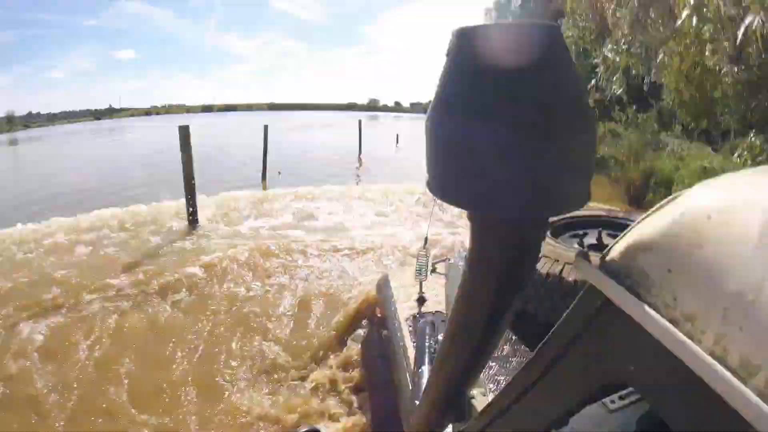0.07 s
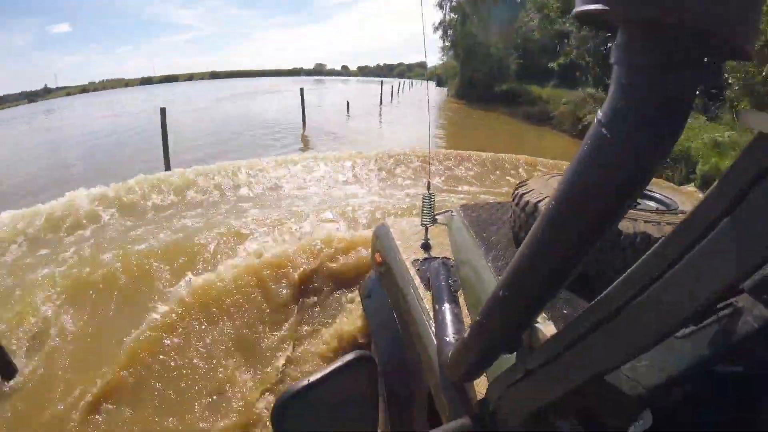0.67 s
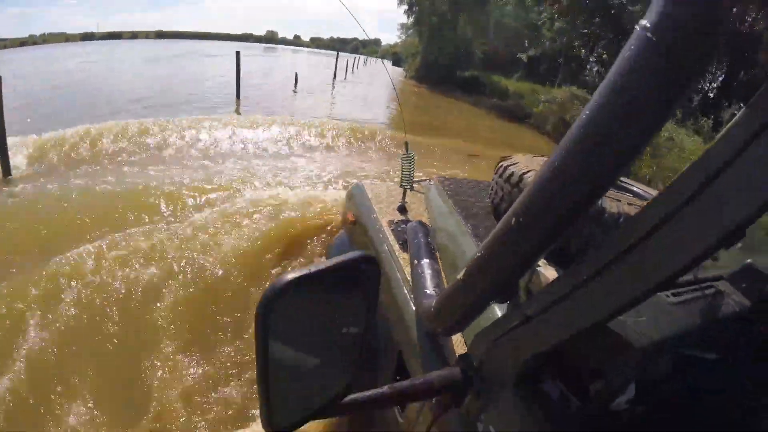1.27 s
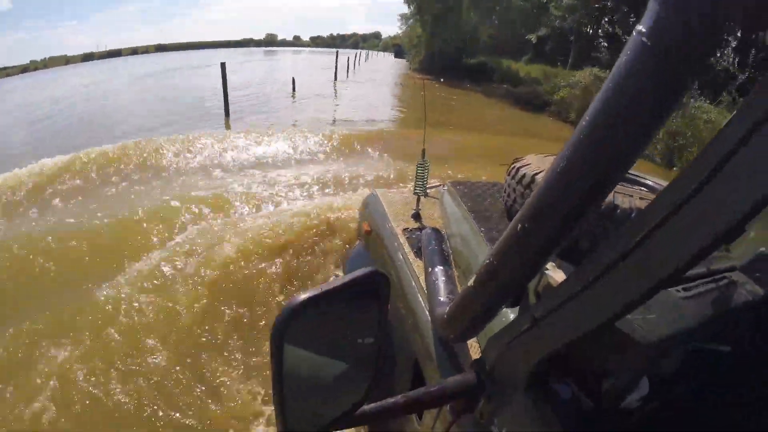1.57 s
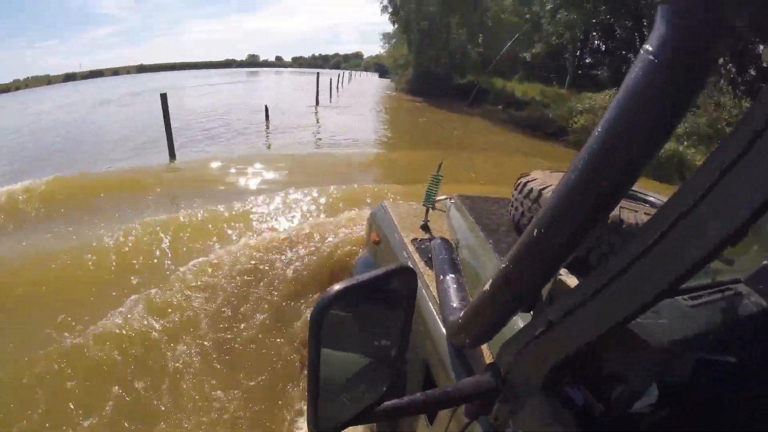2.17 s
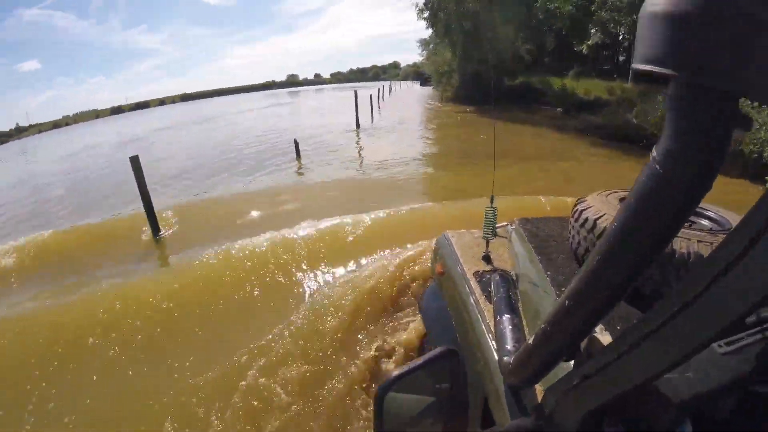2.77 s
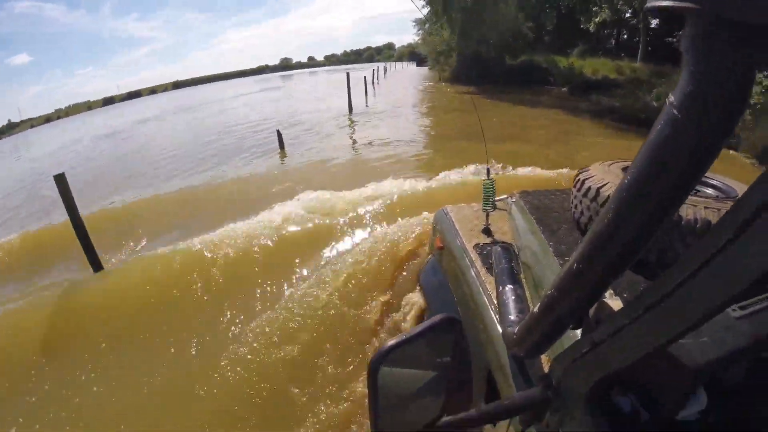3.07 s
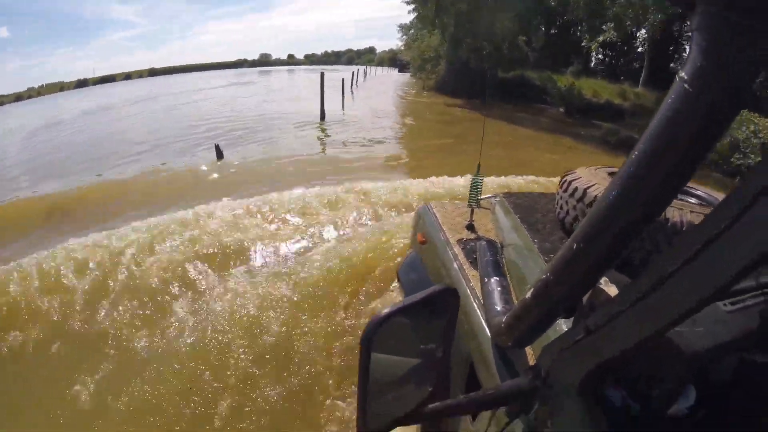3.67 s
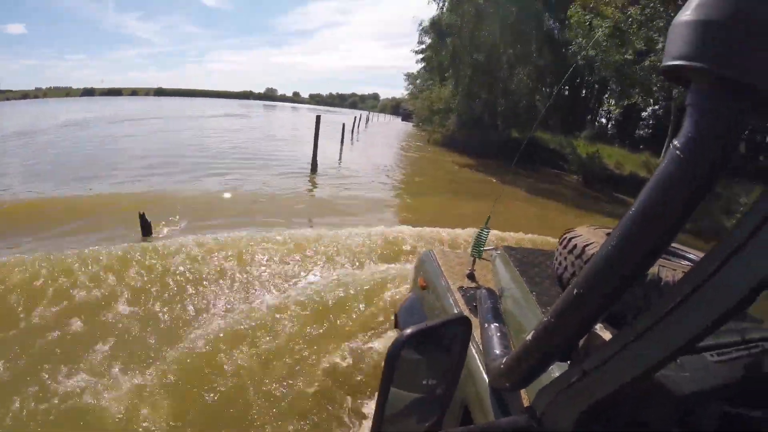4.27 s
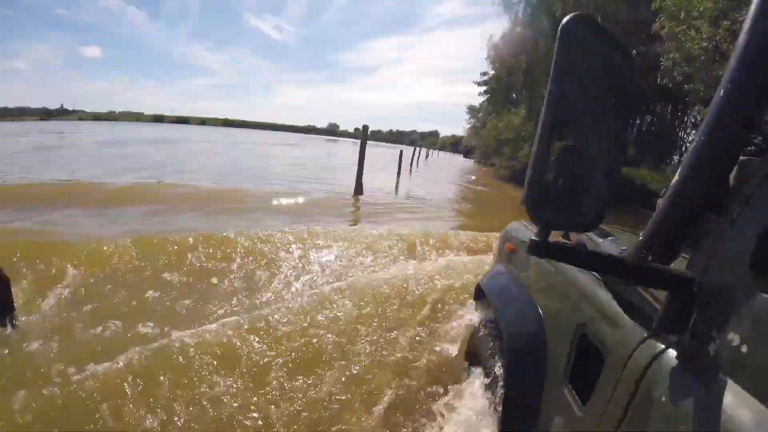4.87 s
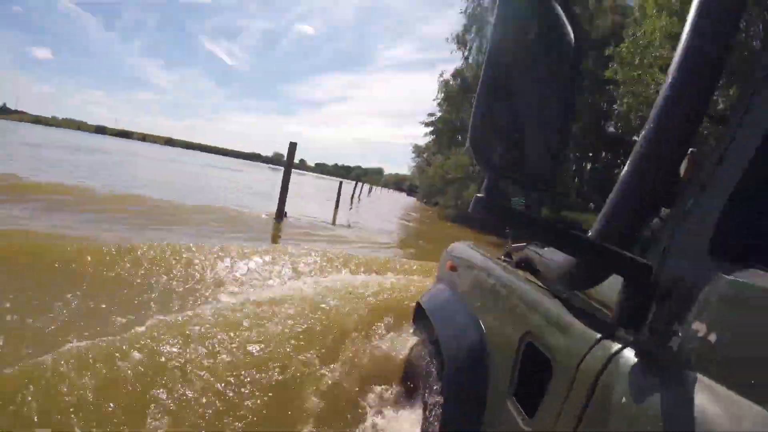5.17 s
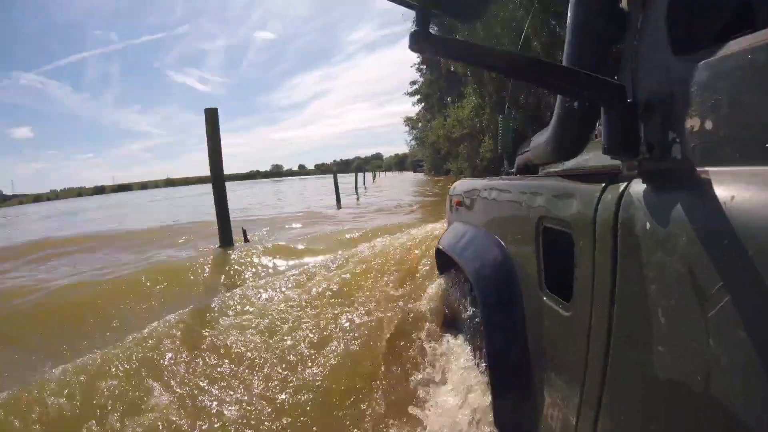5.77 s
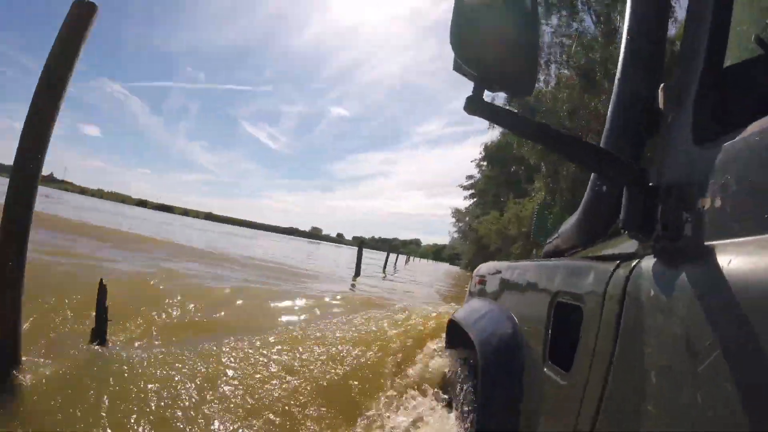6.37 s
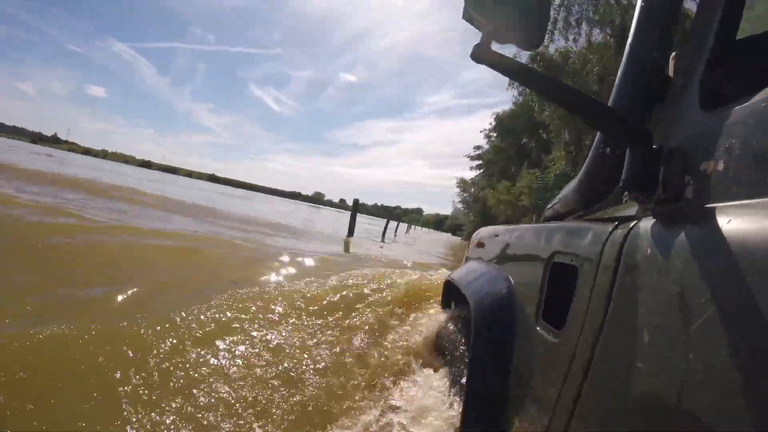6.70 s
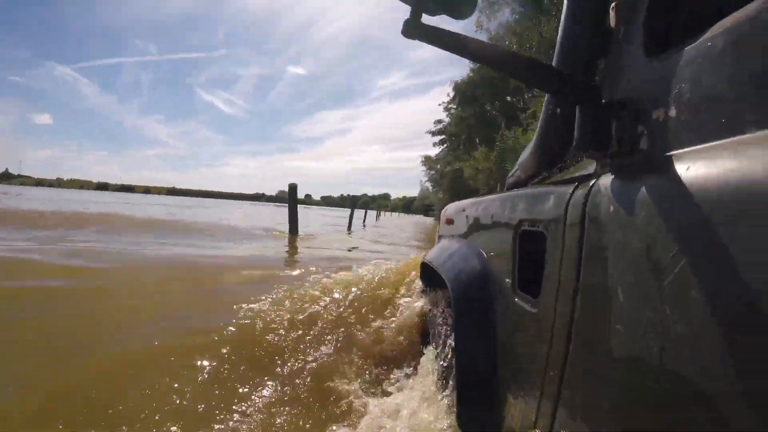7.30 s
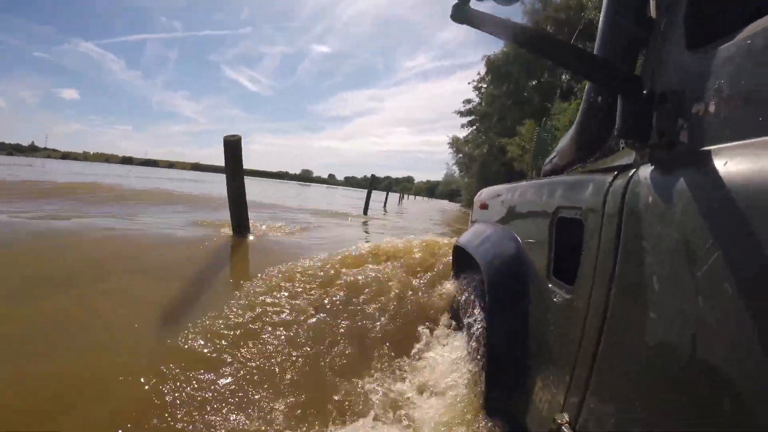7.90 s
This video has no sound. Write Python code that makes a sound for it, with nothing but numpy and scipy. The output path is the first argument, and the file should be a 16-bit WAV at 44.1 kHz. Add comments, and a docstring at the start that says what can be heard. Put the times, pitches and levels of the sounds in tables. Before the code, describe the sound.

A four-cylinder off-road truck drones steadily through deep water, its bow wave rushing and splashing, with wind buffeting the close microphone.

```python
"""A pulsing boom and rasp come first: the snorkel intake of a four-cylinder off-road truck wading a lake,
heard from a cased camera beside it. Each firing draws a gulp of air and excites the pipe's resonances.
The bow wave rushes with foam, ringing bubbles and spray; the tyre churns, and water slaps the wing.
Drops tick on the case, which also takes two dull knocks. A faint squeak falls at the very start,
and turbulent air buffets the microphone throughout."""
import sys
import numpy as np
from scipy import signal
from scipy.fft import rfft, irfft
from scipy.io import wavfile

SR = 44100
rng = np.random.default_rng(int(sys.argv[2]) if len(sys.argv) > 2 else 0)


def file_out(sig):
    """Save sig as 16-bit WAV at sys.argv[1]."""
    # one column per channel
    cols = np.atleast_2d(sig).T
    # limit, then scale
    lim = np.clip(cols, -1, 1)
    pcm = np.round(lim * 32767).astype(np.int16)
    wavfile.write(sys.argv[1], SR, pcm)


N = 350154
TIME = np.arange(N) / SR


# one rev, then the engine hunts gently against the water: (time [s], firing rate [Hz])
FIRING_RATE = [(0, 68.5), (.15, 62.8), (.5, 66.9), (.75, 75.0), (1.11, 85.4), (1.65, 74.2), (2.65, 68.3),
               (3.1, 72.8), (3.5, 69.0), (3.68, 73.2), (4.0, 69.5), (4.62, 73.5), (4.88, 70.0), (5.1, 74.1),
               (5.28, 74.8), (5.53, 69.3), (5.85, 75.7), (6.25, 73.1), (6.5, 75.0), (6.65, 70.9),
               (6.9, 73.1), (7.25, 70.2), (7.68, 70.9), (7.94, 67.3)]
# the throttle eases, then reopens: (time [s], boom gain [dB])
THROTTLE_GAIN = [(0, -0.5), (.09, -9), (.3, -6), (.5, -.7), (.72, 0.9), (1.2, 0.13), (7.94, -0.5)]
# the camera's path: (time [s], position [0 at the snorkel's mouth, 1 down by the wing])
POSITION = [(0, 0.23), (.7, 0.17), (1.3, 0.42), (1.9, 0.25), (2.4, 0.49), (2.95, 0), (3.5, 0.2), (4.45, 0),
            (5.05, 0.56), (5.35, 0.45), (6.0, 0.99), (6.95, 0.77), (7.2, 0.27), (7.5, 0.66), (7.94, 0.33)]
# the engine's upper growl: (time [s], rasp level [dB], drone level [dB])
GROWL_LEVELS = [(0, -30.5, -23.5), (.22, -32.5, -27.5), (.65, -29.5, -23.5), (1.1, -30.5, -26.5),
                (1.7, -30, -25), (2.2, -36, -27.5), (2.45, -31.5, -27), (3.1, -33, -25), (3.8, -36.5, -27),
                (4.4, -31.5, -26), (5.0, -36.5, -33.5), (5.9, -36, -26.5), (6.5, -41, -29.5),
                (7.94, -42.5, -29.5)]

def engine(start_phase=0.5303):
    """Common excitation: one crankshaft sets the timing of boom, drone and rasp."""
    firing_hz, = in_time(FIRING_RATE)
    throttle_db, = in_time(THROTTLE_GAIN)
    position, = in_time(POSITION)
    rasp_db, drone_db = in_time(GROWL_LEVELS)
    firings = start_phase + np.cumsum(firing_hz) / SR
    return (from_db(throttle_db) * boom(firings, firing_hz, position)
            + from_db(drone_db) * drone(firings, firing_hz)
            + from_db(rasp_db) * rasp(firings))


# harmonics 1 to 3: (level at the snorkel [dB], change down by the wing [dB])
BOOM_HARMONICS = [(-12.5, 2.5), (-15.5, -3), (-23.2, -10.5)]

def boom(firings, firing_hz, position, skew_cycles=0.42, flutter_db=0.54):
    """Fourier synthesis: three low harmonics form the lopsided pressure swing of each gulp of air."""
    out = 0
    for k, (db, wing_db) in enumerate(BOOM_HARMONICS, 1):
        level_db = db + wing_db * position + intake_db(k * firing_hz) + flutter_db * k * drift(23.4)
        out += from_db(level_db) * np.cos(2 * np.pi * (k * firings + skew_cycles))
    return np.sqrt(2) * out


# the intake pipe's response: (frequency [Hz], gain [dB])
INTAKE_RESPONSE = [(62, 0.1), (72, -0.53), (84, 1.3), (128, 2.5), (138, -1.5), (145, 1.4), (153, -0.3),
                   (166, -2.5), (203, 2.5), (216, 0.5), (245, -4.5), (280, 4), (305, 0), (332, 2.5),
                   (368, -3), (400, -0.5)]

def intake_db(hz):
    """Frequency response: the pipe's gain on a partial changes as its pitch moves."""
    return np.interp(hz, *np.transpose(INTAKE_RESPONSE))


# line levels, a row per firing harmonic, offset by fractions of the firing rate:
# (3/4 below [dB], 1/2 below [dB], 1/4 below [dB], on the harmonic [dB])
DRONE_LINES = [(-20, -18, -17, -34), (-1, -8, -0.5, -32), (3.5, -3, -5, -18), (1, -5, -3.5, 0),
               (1.5, -27, -6, -1.5), (-2, -12, -10.5, -25), (-7, -7.5, -9, -17), (-16, -12, -18.5, -23),
               (-18.5, -17.5, -13.5, -19.5)]
# body panels: (frequency [Hz], bandwidth [Hz], gain [dB])
PANEL_MODES = [(328.5, 26, 1), (582, 31.5, 14.5)]

def drone(firings, firing_hz, waver_db=2.0, slip_cycles=.025):
    """Subharmonics: unequal cylinders repeat every fourth firing, adding lines between the harmonics."""
    cycles, cycle_hz = firings / len(FIRING_ORDER), firing_hz / len(FIRING_ORDER)
    lines = 0
    for k, db in enumerate(np.ravel(DRONE_LINES), 1):
        phase = k * cycles + rng.random() + slip_cycles * drift(2.4)
        level_db = db + intake_db(k * cycle_hz) + waver_db * drift(1.86)
        lines += from_db(level_db) * np.cos(2 * np.pi * phase)
    # a panel hums in sympathy with whichever line passes its pitch
    panels = sum(from_db(db) * resonate(lines, hz, width) for hz, width, db in PANEL_MODES)
    return rms_one(lines + panels)


# the cylinders in turn: (strength [dB], delay [firing intervals])
FIRING_ORDER = [(2, 0), (-2, .04), (-1.5, -.03), (1.5, .02)]
# the snorkel's air column: (frequency [Hz], bandwidth [Hz], gain [dB])
SNORKEL_MODES = [(505, 47, -1.5), (571, 39, 1.5), (627.5, 50, -1), (708, 55, -4)]

def rasp(firings, uneven_db=3.5, puff_db=-3, pulsing_db=8):
    """Pipe resonance: each valve opening excites the snorkel with a kick and a puff of turbulent air."""
    kick_lead, puff_lead, jitter = 0.5524, .17, .007   # firing intervals
    number = np.arange(1, int(firings[-1]))
    strength_db, delay = np.array(FIRING_ORDER)[number % len(FIRING_ORDER)].T
    time_scatter, level_scatter = rng.standard_normal((len(number), 2)).T
    times = np.interp(number - kick_lead + delay + jitter * time_scatter, firings, TIME)
    kicks = body(clicks(zip(times, strength_db + uneven_db * level_scatter)), SNORKEL_MODES)
    airflow = from_db(pulsing_db * np.cos(2 * np.pi * (firings + puff_lead)))
    puffs = airflow * body(rng.standard_normal(N), SNORKEL_MODES)
    return rms_one(rms_one(kicks) + from_db(puff_db) * rms_one(puffs))


# strength of the bow wave: (time [s], level [dB])
WAVE_LEVEL = [(0, -39.5), (.22, -39), (.52, -34), (.95, -38), (1.5, -35.5), (1.8, -38.5), (2.13, -36),
              (2.35, -38), (2.9, -34.5), (3.4, -36.5), (4.7, -35.5), (5.5, -34), (5.9, -35), (6.25, -34),
              (6.65, -35), (6.95, -33.5), (7.35, -35.5), (7.94, -31.5)]
# rushing foam: (frequency [Hz], spectral level [dB])
FOAM_SPECTRUM = [(400, -22), (750, 0.5), (1000, -0.5), (1280, -1), (1450, -2.5), (1750, -4), (2300, -7),
                 (3100, -12), (3800, -17.5), (4400, -22.5), (6000, -64)]
# falling spray: (frequency [Hz], spectral level [dB])
SPRAY_SPECTRUM = [(3500, -55), (4400, -21), (5000, -11), (5550, -3.5), (6050, -0.5), (6700, -7),
                  (7600, -10.5), (9000, -15.5), (10800, -17), (11900, -33.5), (13200, -29), (14300, -36),
                  (15000, -49)]

def bow_wave(foam_db=0.5, fizz_db=-14.0, mist_db=-4.48, patter_db=-4.98, surge_db=0.66, swell_db=0.27):
    """Air entrainment: the breaking crest rushes with foam and bubbles; its spray patters back."""
    wave_db, = in_time(WAVE_LEVEL)
    swing_db = surge_db * drift(56) + swell_db * drift(4.5) + 0.14 * spills_db()
    foam = from_db(foam_db) * coloured(grains(per_s=9000, spread_db=1.5), FOAM_SPECTRUM)
    fizz = from_db(fizz_db) * bubbles(low_hz=751, high_hz=2890, per_s=700, spread_db=5.5, q=20)
    mist = from_db(mist_db) * coloured(rng.standard_normal(N), SPRAY_SPECTRUM)
    droplets = grains(per_s=6000 * from_db(2.5 * drift(40)), spread_db=2.0)
    patter = from_db(patter_db) * coloured(droplets, SPRAY_SPECTRUM)
    return from_db(wave_db + swing_db) * (foam + fizz + mist + patter)


# churned water: (frequency [Hz], spectral level [dB])
CHURN_SPECTRUM = [(60, -18), (110, 2), (180, 1), (260, 4.5), (330, 0.5), (400, -2), (475, 1.5), (560, -11),
                  (700, -9), (850, -17), (1300, -18.5)]

def wheel_churn(base_db=-33, wave_share=0.59, wing_db=3, lump_db=0.5, gurgle_db=-7.5):
    """Turbulence: the tyre stirs a low wash full of large bubbles, swelling with the bow wave."""
    wave_db, = in_time(WAVE_LEVEL)
    position, = in_time(POSITION)
    level_db = base_db + wave_share * (wave_db - wave_db.mean()) + wing_db * position + spills_db()
    wash = coloured(rng.standard_normal(N), CHURN_SPECTRUM) * from_db(lump_db * drift(33))
    gurgle = bubbles(low_hz=300, high_hz=850, per_s=260, spread_db=2.2, q=14)
    return from_db(level_db) * (wash + from_db(gurgle_db) * gurgle)


# the wheel arch overflows: (time [s], rise of the churn [dB])
ARCH_SPILLS = [(.75, 2.5), (1.35, 2), (4.3, 2), (5.25, 5.5), (5.97, 0), (6.8, 2.5), (7.2, 5.5), (7.65, 1.5)]

def spills_db():
    """Amplitude modulation: each spill from the wheel arch is a short, smooth rise in level."""
    return sum(db * bell(s, half_width_s=0.19) for s, db in ARCH_SPILLS)


def bubbles(low_hz, high_hz, per_s, spread_db, q, sizes=24):
    """Bubble resonance: born in clumps, each bubble rings at the pitch of its size; rms 1."""
    births = grains(per_s * from_db(3 * drift(8)), spread_db)
    size = rng.integers(0, sizes, N)
    pitches = np.geomspace(low_hz, high_hz, sizes)
    return rms_one(sum(resonate(births * (size == k), hz, hz / q) / hz for k, hz in enumerate(pitches)))


# water striking the wing: (time [s], cavity frequency [Hz], level [dB])
WING_SLAPS = [(.232, 700, -30), (.545, 630, -26), (.588, 590, -27), (1.35, 1250, -35), (2.45, 650, -25),
              (2.62, 600, -29), (2.72, 600, -29), (5.84, 750, -31), (7.17, 1150, -32), (7.205, 300, -25)]

def slaps(q=5.4):
    """Cavity resonance: a sheet of water traps a pocket of air, which rings briefly."""
    out = np.zeros(N)
    for s, hz, db in WING_SLAPS:
        swell = bell(s, half_width_s=.016)
        band = resonate(rng.standard_normal(N), hz, hz / q)
        pocket = swell * resonate(band, hz, hz / q)
        out += from_db(db) * pocket * np.std(swell) / np.std(pocket)
    return out


# drops on the case: (time [s], relative level [dB])
DROP_HITS = [(0.2646, -29), (1.4037, -22.5), (3.3393, -26), (4.1031, -29), (5.3582, -24.5), (6.3343, -27),
             (7.0836, -29), (7.638, -26)]
# the case's shell: (frequency [Hz], bandwidth [Hz], gain [dB])
CASE_MODES = [(1800, 900, -16), (5570, 220, 8), (6300, 380, 12.5), (7600, 1200, -15), (10400, 1200, -19)]
# dull knocks on the case: (time [s], relative level [dB])
KNOCK_HITS = [(.152, -8), (5.581, -1.5)]

def case_impacts(drop_gain_db=19.0, knock_gain_db=44.0):
    """Impulse response: sharp drops ring the shell's high modes; soft knocks give one short low swing."""
    ticks = body(clicks(DROP_HITS), CASE_MODES)
    soft_contact = signal.butter(2, 260, fs=SR, output="sos")
    force = signal.sosfilt(soft_contact, clicks(KNOCK_HITS) + 1e-18)
    thuds = resonate(force, hz=165, width_hz=75)
    return from_db(drop_gain_db) * ticks + from_db(knock_gain_db) * thuds


# the squeak's fall: (time [s], fundamental [Hz], level [dB])
SQUEAK_GLIDE = [(0, 605, -42), (.025, 580, -35), (.05, 522, -32), (.078, 478, -35), (.11, 470, -90)]
# its partials: (harmonic [number], relative level [dB])
SQUEAK_HARMONICS = [(1, 0), (2, -13), (3, -5), (4, -10)]

def squeak():
    """Harmonic series: the partials of a faint squeak slide down together and stop."""
    hz, level_db = in_time(SQUEAK_GLIDE)
    phase = np.cumsum(hz) / SR
    tone = sum(from_db(level_db + db) * np.sin(2 * np.pi * k * phase) for k, db in SQUEAK_HARMONICS)
    return tone * (TIME < SQUEAK_GLIDE[-1][0])


# short gusts: (time [s], level [dB])
WIND_GUSTS = [(.33, -18.5), (1.08, -29), (3.5, -25), (4.96, -24), (7.85, -23)]
# buffeting air: (frequency [Hz], spectral level [dB])
WIND_SPECTRUM = [(10, -38), (20, -5.5), (40, 1.5), (60, -5), (100, -6.5), (200, -20.5), (400, -50)]

def wind(breeze_db=-29, wing_db=4.5, lump_db=2.5):
    """Turbulent pressure: a breeze and a few gusts make lumpy low swings at the microphone."""
    position, = in_time(POSITION)
    breeze = from_db(breeze_db + wing_db * position)
    gusts = sum(from_db(db) * bell(s, half_width_s=0.078) for s, db in WIND_GUSTS)
    lumps = from_db(lump_db * drift(10.6))
    return (breeze + gusts) * lumps * coloured(rng.standard_normal(N), WIND_SPECTRUM)


def from_db(db):
    """Decibels to amplitude ratio."""
    return 10 ** (np.asarray(db) / 20)


def rms_one(x):
    """Normalisation to unit rms."""
    return x / np.sqrt(np.mean(x ** 2) + 1e-20)


def in_time(rows):
    """Linear interpolation of each column at every sample."""
    times, *columns = np.transpose(rows)
    return [np.interp(TIME, times, column) for column in columns]


def bell(centre_s, half_width_s):
    """Gaussian envelope with peak 1."""
    return np.exp(-((TIME - centre_s) / half_width_s) ** 2)


def coloured(x, spectrum):
    """Spectral shaping of a flat signal; rms 1."""
    hz, level_db = np.transpose(spectrum)
    log_bins = np.log(np.maximum(np.fft.rfftfreq(N, 1 / SR), 1))
    gain_db = np.interp(log_bins, np.log(hz), level_db, left=-90, right=-90)
    return rms_one(irfft(rfft(x) * from_db(gain_db), N))


def drift(rate_hz):
    """Low-passed noise: a slow random fluctuation with spread 1."""
    step, settle = 40, 2000
    pole = np.exp(-2 * np.pi * rate_hz * step / SR)
    noise = rng.standard_normal(N // step + settle + 2)
    slow = signal.lfilter([1], [1, -2 * pole, pole * pole], noise)[settle:]
    return np.interp(np.arange(N) / step, np.arange(len(slow)), rms_one(slow))


def resonate(x, hz, width_hz):
    """A damped resonator with peak gain 1."""
    r = np.exp(-np.pi * width_hz / SR)
    feedback = [1, -2 * r * np.cos(2 * np.pi * hz / SR), r * r]
    return signal.lfilter(np.array([1, 0, -1]) * (1 - r * r) / 2, feedback, x + 1e-18)


def body(x, modes):
    """Modal sum: parallel resonators with alternating signs."""
    return sum((-1) ** k * from_db(db) * resonate(x, hz, width)
               for k, (hz, width, db) in enumerate(modes))


def clicks(events):
    """Impulse train from rows of (time [s], level [dB])."""
    out = np.zeros(N)
    for s, db in events:
        out[int(s * SR)] += from_db(db)
    return out


def grains(per_s, spread_db):
    """Shot noise: random impulses, many small and a few large."""
    sizes = from_db(spread_db * np.minimum(rng.exponential(1, N), 5))
    signs = rng.choice([-1, 1], N)
    return sizes * signs * (rng.random(N) < per_s / SR)


def scene():
    """Superposition in a free field: every source is close by, in the open air."""
    water = bow_wave() + wheel_churn() + slaps()
    return (engine() + water + case_impacts() + squeak() + wind())[None]


def record(dry, ceiling=.9, cutoff_hz=15000):
    """Soft saturation rounds the highest peaks; a low-pass filter cuts the top."""
    rounded = dry / (1 + (dry / ceiling) ** 8) ** (1 / 8)
    return signal.sosfilt(signal.ellip(10, .1, 80, cutoff_hz, fs=SR, output="sos"), rounded)


dry = scene()
out = record(dry)
file_out(out)
```